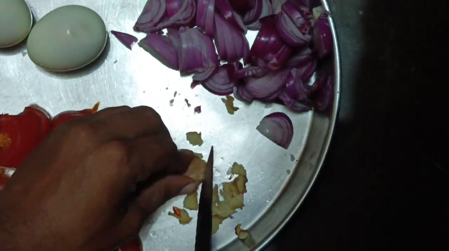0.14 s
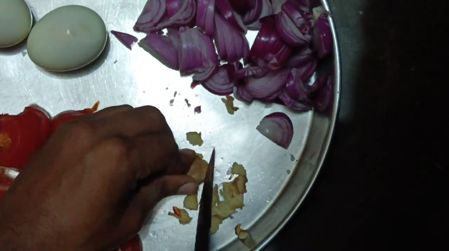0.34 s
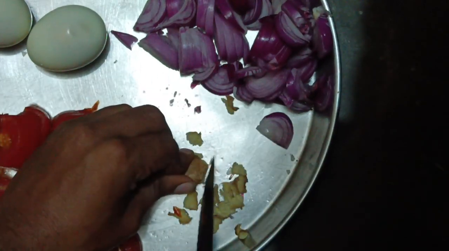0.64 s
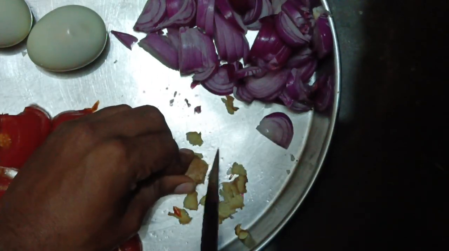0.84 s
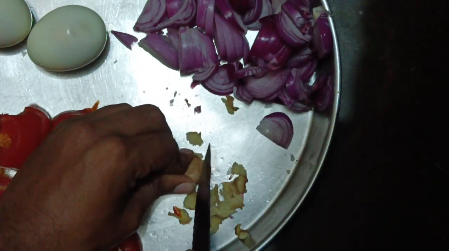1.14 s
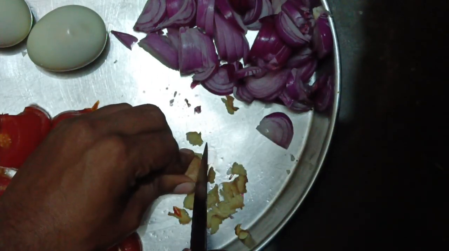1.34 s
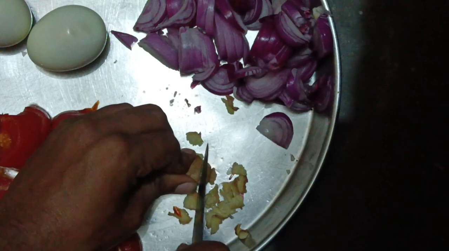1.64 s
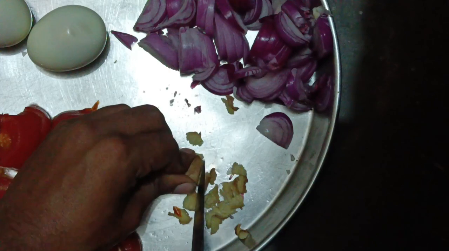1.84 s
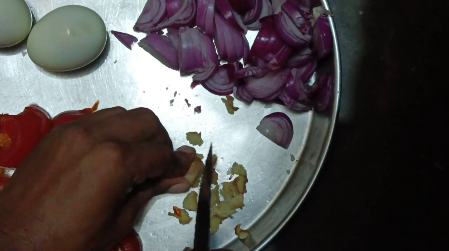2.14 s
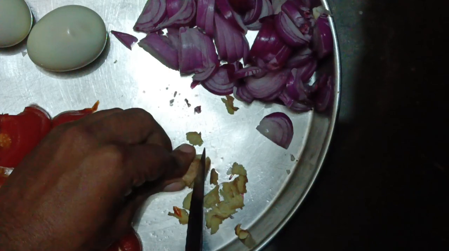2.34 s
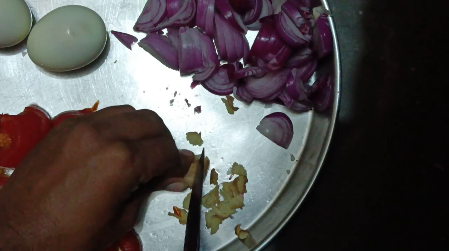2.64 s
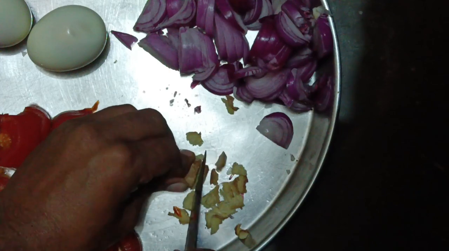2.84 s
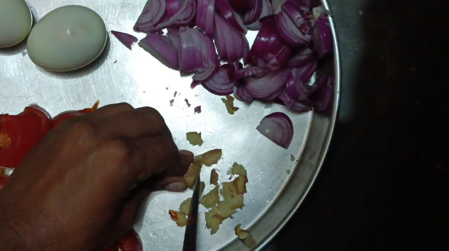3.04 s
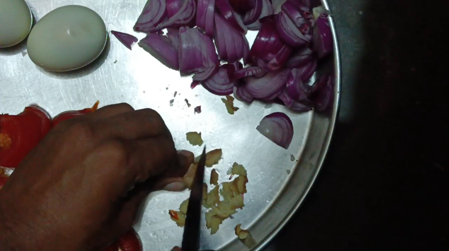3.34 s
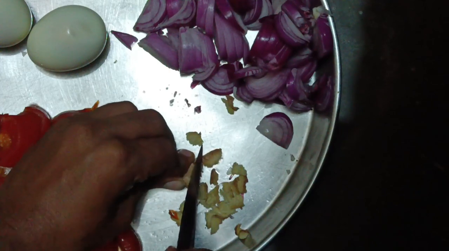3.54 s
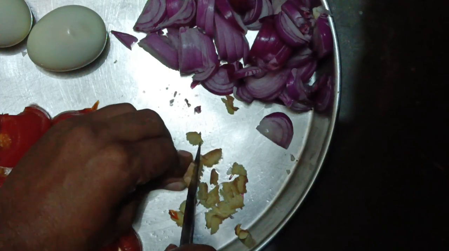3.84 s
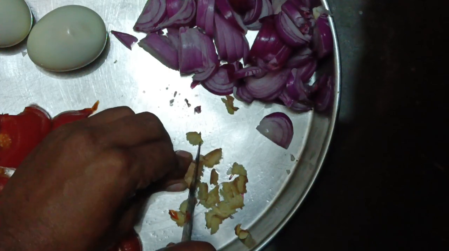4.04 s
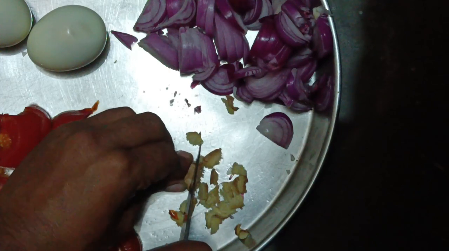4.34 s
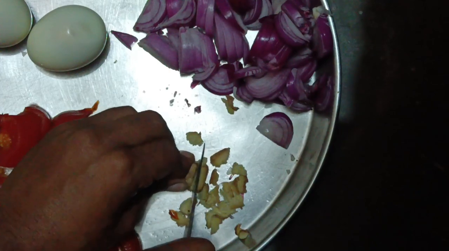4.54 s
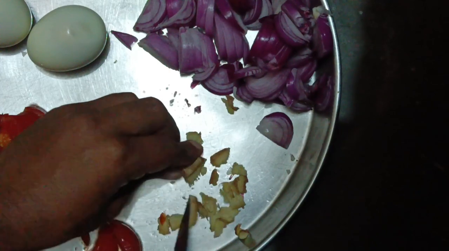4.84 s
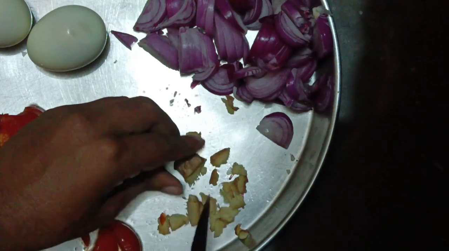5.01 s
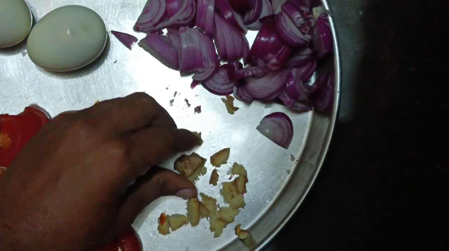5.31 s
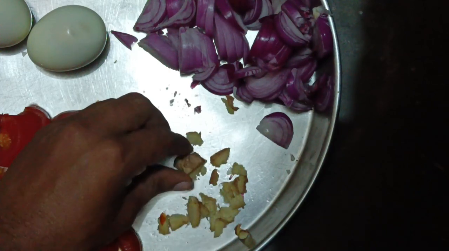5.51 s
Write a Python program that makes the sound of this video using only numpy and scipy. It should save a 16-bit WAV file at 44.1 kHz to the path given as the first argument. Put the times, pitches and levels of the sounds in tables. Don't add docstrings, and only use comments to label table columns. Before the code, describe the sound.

A knife cuts ginger on a steel plate, very close and stronger on the right. A faint squeal leads to hard metallic knocks at uneven intervals, with little crunches, ticks and drags between. Bare kitchen walls answer each blow briefly. Dull regular thuds come from next door, over a very quiet lorry drone and patchy street noise picked up by a phone.

```python
import sys
import numpy as np
from scipy import signal
from scipy.fft import rfft, irfft
from scipy.io import wavfile
from scipy.ndimage import uniform_filter1d

SR = 44100
rng = np.random.default_rng(int(sys.argv[2]) if len(sys.argv) > 2 else 0)


def volts(x):
    e = np.asarray(x, float) / 20
    return 10 ** e


def store_wav(level_fs):
    pcm = np.round(np.clip(np.atleast_2d(level_fs), -1, 1) * 32767)
    wavfile.write(sys.argv[1], SR, pcm.T.astype(np.int16))


N = 250047


def unit(x):
    return x / np.sqrt(np.mean(x ** 2))


def colour(x, points):
    hz, db = np.transpose(points)
    f = np.fft.rfftfreq(x.shape[-1], 1 / SR) + 1
    return irfft(rfft(x) * volts(np.interp(np.log(f), np.log(hz), db)), x.shape[-1])


def band(x, lo_hz, hi_hz):
    return signal.sosfilt(signal.butter(2, [lo_hz, hi_hz], "band", fs=SR, output="sos"), x)


def stereo(size, alike_hz=500):
    mid, side = rng.standard_normal((2, size))
    side = signal.sosfilt(signal.butter(1, alike_hz, "high", fs=SR, output="sos"), side)
    return np.array([mid + side, mid - side])


def walk(rate, size=N):
    hold = int(SR / rate)
    steps = np.repeat(rng.standard_normal(size // hold + 1), hold)
    return 1.4 * uniform_filter1d(uniform_filter1d(steps, hold), hold)[:size]


def steep(noise, hz, width, drift=0.019):
    turn = np.exp(2j * np.pi * np.cumsum(hz * (1 + drift * walk(9, size=noise.shape[-1]))) / SR)
    lowpass = signal.butter(2, width / 2.5, fs=SR, output="sos")
    return unit(np.real(turn * signal.sosfilt(lowpass, noise * turn.conj())))


def swells(rows, rise_db_s, fall_db_s):
    t = np.arange(0, N / SR + .01, .002)
    gain = 0
    for a, b, db in rows:
        gain = gain + volts(db - rise_db_s * np.maximum(a - t, 0) - fall_db_s * np.maximum(t - b, 0))
    return np.interp(np.arange(N) / SR, t, gain)


def ring(modes, seconds, scatter_db=0., detune=0.):
    hz, db, t60 = np.transpose(modes)[:, :, None]
    t = np.arange(int(seconds * SR)) / SR
    luck = rng.standard_normal((2, len(modes), 1))
    sense = (-1.) ** np.arange(len(modes))[:, None]
    fade = volts(db + scatter_db * luck[0] - 60 * t / t60)
    x = (sense * fade * np.sin(2 * np.pi * hz * (1 + detune * luck[1]) * t)).sum(axis=0)
    return x / np.abs(x).max()


def add(out, x, s):
    i = int(s * SR)
    out[..., i:i + x.shape[-1]] += x[..., :N - i]


def ports(x, pan_db):
    lag_s = 0.00053
    late = np.pad(x, (int(lag_s * SR), 0))[:len(x)]
    late = signal.lfilter(*signal.butter(3, 8300, fs=SR), late)
    return np.array([late * volts(pan_db / 2), x * volts(-pan_db / 2)])


def lorry():
    # (from/s, to/s, level/dB)
    revs = [(-.1, .2, -81.5), (.31, .36, -55), (.47, .51, -55), (.61, .8, -52), (.86, .94, -51),
            (.97, 1.22, -51.5), (1.37, 1.6, -58), (1.78, 1.95, -56.5), (2.2, 2.25, -74.5),
            (2.52, 2.66, -70), (2.9, 3.02, -59.5), (3.25, 3.45, -66), (4.0, 4.25, -62.5), (4.54, 4.92, -62),
            (5.44, 5.7, -61.5)]
    drone_hz = 64
    turn = 2 * np.pi * np.cumsum(drone_hz * (1 + .025 * walk(3))) / SR
    rumble = unit(band(band(stereo(N, 150), 30, 110), 30, 110))
    drone = unit(volts(2.0 * walk(12)) * np.sin(turn) + .55 * rumble)
    return swells(revs, rise_db_s=259, fall_db_s=125.5) * drone


def traffic():
    # (from/s, to/s, level/dB, bass share/dB, treble share/dB)
    openings = [(-.05, 0.2, -72.5, -13.5, 7.5), (0.933, 1.335, -75, -11, -3),
                (0.463, 0.463, -38, -16.5, -16.5), (0.566, 0.798, -53, -27.5, -20),
                (0.745, 0.912, -63, 5, -3), (1.472, 1.54, -73.5, 5.5, 0), (1.662, 1.839, -56, -8.5, 9),
                (2.511, 2.682, -71.5, 8, -7), (2.808, 2.939, -44, -9.5, -40.5),
                (2.97, 3.066, -51, -11.5, 3.5), (3.12, 3.283, -45.5, -19.5, -17),
                (3.326, 3.486, -58.5, 2, 9.5), (3.67, 3.715, -55, -5.5, -7), (4.0, 4.15, -68.5, 11, -3),
                (4.164, 4.285, -58, 3.5, -6), (4.483, 4.838, -50.5, -21, 7.5), (4.81, 5.034, -65, 5, -3.5),
                (5.062, 5.19, -66.5, -7, 5.5), (5.547, 5.706, -67, -1.5, 2)]
    # (f/Hz, level per Hz/dB)
    wash_colour = [(410, -35), (700, -2), (1110, 0), (1260, 0), (1930, -7), (2160, -4.5), (2780, -8),
                   (3030, -7.5), (3310, -11), (6200, -21), (7670, -14.5), (10500, -35), (14000, -57)]
    start, end, db, bass_db, treble_db = np.transpose(openings)
    bass, middle, treble = (swells(zip(start, end, db + share), rise_db_s=206.5, fall_db_s=165)
                            for share in (bass_db, 0, treble_db + 0.5))
    low = unit(volts(3.0 * walk(10)) * band(band(stereo(N, 700), 130, 600), 130, 600))
    noise, wash = colour(stereo(N), wash_colour), 0
    for hz in 700 * 2 ** (np.arange(26) / 6):
        opening = middle if hz < 3000 else treble
        wash = wash + volts(2.5 * walk(6)) * opening * band(noise, hz, hz * 1.09)
    return bass * low + volts(-1.5) * wash / np.std(noise)


def pounding():
    # (t/s, peak/dB, brightness/dB, share above 200 Hz/dB)
    thuds = [
        (1.769, -28.5, -8.5, 0),
        (2.496, -42.5, 21, 9),
        (3.22, -27, -12, 1),
        (3.957, -25, 17, -0.5),
        (4.689, -27, 15, 1),
        (5.402, -29, -8.5, -0.5),
    ]
    # (f/Hz, level/dB, t60/s)
    house = [(90.4, -11, 1.3), (129.9, -9.5, 2.1), (145.1, 0, 1.26), (163.9, 1, 1.1), (145.3, -4, 1.3),
             (165, -6, 1.1), (180.9, -9.5, 1.9), (202, -8, 1.3), (212.9, 8, 0.3), (226, -11.5, 1.7),
             (263.6, 2, 0.38), (243.3, -7, .9), (286, -5.5, 0.87), (315, -28.5, 0.27), (346.6, -8, 0.88),
             (442, -9, 0.4), (509.6, -6.5, 0.21), (610, -27, 0.11), (696, -16, 0.49), (844, -13.5, 0.29),
             (970, -23.5, 0.15)]
    out, t = np.zeros((2, N)), np.arange(int(1.0 * SR)) / SR
    swell = (1 - np.exp(-t / 0.012)) / (1 + (t / .5) ** 8)
    spread = [0.03496, 0, .2] * rng.standard_normal((3 * len(house), 3))
    others = np.repeat(house, 3, axis=0) * (1 + spread)
    others = others - [0, 1, 0] * np.where(others[:, :1] < 190, 13, 5)
    cluster = np.vstack([house, others])
    waves = np.array([ring(cluster, 1.0, 2., .002), ring(cluster, 1.0, 2., .002)]) * swell
    dull = volts(-11.0 - 60 * t / 0.61) * unit(band(band(stereo(len(t), 900), 210, 540), 210, 540)) * swell
    slap = volts(-34.0 - 60 * t / .5) * unit(band(band(stereo(len(t)), 550, 2100), 670, 970))
    edge = volts(-27.0 - 60 * t / 0.093) * unit(band(band(stereo(len(t)), 1140, 1260), 1140, 1260))
    slap = (slap + edge) * swell
    for s, db, bright_db, upper_db in thuds:
        body = colour(waves, [(180, 0.0035), (220, upper_db)])
        add(out, volts(db) * (body + volts(upper_db) * dull + volts(bright_db) * slap), s)
    return out


def flickering(rows):
    out, flicker = np.zeros((2, N)), volts(2 * walk(14))
    for start, end, hz, width, db in rows:
        size = int((end - start) * SR)
        if start:
            fade = signal.windows.tukey(size, .6)
        else:
            fade = np.minimum(3 * np.linspace(1, 0, size), 1)
        shimmer = flicker[rng.integers(N - size):][:size]
        add(out, volts(db) * steep(stereo(size), hz, width, .002) * fade * shimmer, start)
    return out


def hums():
    # (from/s, to/s, f/Hz, level/dB)
    hum_rows = [(.11, .22, 1230, -61.5), (3.75, 3.83, 1270, -69.5), (5.4, 5.52, 910, -64.5),
                (.2, .34, 155, -69), (.58, 0.726, 150, -65), (.74, 0.957, 147, -50.5),
                (0.74, 1.26, 142, -60.5), (.74, 1.01, 190, -55.5), (.95, 1.22, 187, -65.5),
                (1.3, 2, 136, -66.5), (1.423, 1.555, 263, -68.5), (3.72, 3.9, 315, -77),
                (2.83, 3.18, 252, -57), (2.15, 2.4, 330, -77.5), (3.64, 3.72, 462, -62.5)]
    return flickering([(a, b, hz, 0.084 * hz, db) for a, b, hz, db in hum_rows])


def squeal():
    # (f/Hz, width/Hz, level/dB, duration/s)
    tones = [(1249, 51, -65.5, 0.37), (1530, 140, -73.5, 0.17), (2040, 80, -83, 0.33),
             (2796, 61, -76.5, .3), (3237, 50, -75, .25), (3600, 63, -77.5, 0.27), (4030, 65, -82.5, .3),
             (4450, 60, -82, 0.17), (4800, 65, -86, 0.2), (5350, 100, -85.5, 0.3), (7700, 570, -80, 0.11)]
    return flickering([(0, s, hz, width, db) for hz, width, db, s in tones])


def streaks():
    # (from/s, to/s, f/Hz, level/dB)
    thin_tones = [(.76, .93, 5320, -85), (.82, .91, 4900, -85), (1.12, 1.27, 4930, -89),
                  (1.32, 1.49, 4900, -77), (.92, 1.2, 3700, -88), (.93, 1.32, 2400, -81),
                  (.88, 1.34, 2000, -76), (.95, 1.06, 2780, -82), (1.32, 1.47, 2380, -76),
                  (1.3, 1.48, 3580, -74), (4.9, 5.05, 1290, -70), (5.08, 5.34, 1250, -74),
                  (4.95, 5.29, 1000, -74), (3.96, 4.2, 1300, -70), (3.96, 4.2, 1690, -72),
                  (3.96, 4.3, 2400, -72), (3.98, 4.2, 3500, -78), (5.42, 5.7, 1420, -76)]
    width_hz = 81
    return flickering([(a, b, hz, width_hz, db) for a, b, hz, db in thin_tones])


def noise_patches():
    # (f/Hz, width/Hz, level/dB)
    patch_bands = [(610, 180, 1), (975, 130, -1.5), (1250, 210, -3), (1481, 300, -4), (1800, 220, -2),
                   (2050, 240, -2), (2380, 150, -3), (3000, 530, -7), (3600, 500, -5.5), (4120, 720, -6),
                   (4968, 540, 1), (7540, 1400, 2.5), (10400, 680, -5.5)]
    # (from/s, to/s, level/dB, strongest near/Hz, fall away from there/dB per octave)
    patch_rows = [(0.535, 0.748, -53.5, 1138, 36), (0.689, 0.928, -60.5, 975, 28),
                  (0.791, 1.025, -65, 594, 43.5), (0.849, 1.484, -63.5, 1500, 59),
                  (1.306, 1.467, -69, 3600, 53), (5.028, 5.202, -60, 3730, 33.5),
                  (1.273, 1.553, -73.5, 610, 38), (1.313, 1.499, -63.5, 2860, 16),
                  (2.477, 2.703, -62.5, 1100, 25.5), (2.583, 2.772, -73.5, 6200, 8),
                  (2.98, 3.135, -70, 9500, 13), (3.13, 3.273, -74, 10400, 40), (3.27, 3.495, -75, 8550, 10),
                  (4.077, 4.319, -63.5, 4620, 29), (5.07, 5.28, -68, 2900, 36.5),
                  (5.39, 5.52, -66.5, 1680, 37), (5.524, 5.75, -69.5, 2156, 18),
                  (5.495, 5.752, -74, 5350, 19.5), (3.904, 4.094, -76, 2250, 16.5)]
    out, patch_noise = np.zeros((2, N)), stereo(N)
    for hz, width, db in patch_bands:
        rows = []
        for a, b, patch_db, near_hz, fall_db in patch_rows:
            rows.append((a + .04, b - .04, db + patch_db - fall_db * abs(np.log2(hz / near_hz))))
        out += swells(rows, 340, 300) * steep(patch_noise, hz, width) * volts(2.8 * walk(16))
    return out


def rim():
    # (f/Hz, width/Hz, level/dB, t60/s)
    rim_tones = [(1515, 160, -42.5, 0.49), (1864, 124, -39.5, 0.33), (2080, 150, -34, 0.4),
                 (2257, 250, -43.5, 0.42), (3556, 250, -36.5, 0.5), (3880, 370, -37.5, 0.54),
                 (5610, 970, -35, 0.41)]
    out, t = np.zeros((2, N)), np.arange(int(.4 * SR)) / SR
    tones = sum(volts(db - 60 * t / t60) * steep(stereo(len(t)), hz, width)
                for hz, width, db, t60 in rim_tones)
    add(out, tones * np.minimum(t / 0.0032, 1), 4.691)
    return out


def walls():
    # (f/Hz, level per Hz/dB)
    wall_colour = [(110, -48.5), (180, -19.5), (293, -12.5), (370, -8.5), (450, -7), (600, -11), (830, -12),
                   (1000, -14), (1450, -4), (1550, -12), (1650, -3), (1880, -12.5), (2360, -2.5),
                   (2560, -5), (2820, -1.5), (3060, -7.5), (3250, -7.5), (3420, -7.5), (3680, -7.5),
                   (4250, -7.5), (4800, -7.5), (5590, -8), (6300, -16.5), (6800, -15), (7550, -6.5),
                   (9640, -27), (13500, -38.5), (15300, -40), (16000, -52)]
    # (f/Hz, width/Hz, level/dB, t60/s)
    linger = [(1480, 90, -22.5, 0.41), (1651, 80, -18.5, 0.35), (2000, 46, -24.5, .4),
              (2375, 130, -19.5, 0.5), (2808, 42, -17.5, .5), (3180, 60, -27, .4), (3655, 110, -22.5, 0.55),
              (4250, 99, -26, .45), (4420, 200, -27, .6), (7550, 370, -23.5, 0.45)]
    hold_s, t60_s, uneven_db = 0.044, 0.28, 2
    t = np.arange(int(.6 * SR)) / SR
    grains = volts(3.6 * np.minimum(rng.exponential(size=(2, len(t))), 4))
    past_hold = (np.sqrt((t - hold_s) ** 2 + 0.068 ** 2) + t - hold_s) / 2
    fade = volts(-60 * past_hold / t60_s)
    peaks = np.c_[500 * 1.04 ** np.arange(80), uneven_db * rng.standard_normal(80)]
    diffuse = unit(colour(colour(stereo(len(t)) * grains, wall_colour), peaks))
    tones = sum(volts(db - 60 * t / t60) * steep(stereo(len(t)), hz, width, 0.0024)
                for hz, width, db, t60 in linger)
    return (diffuse * fade + tones) * (1 - np.exp(-t / .009))


def room(blows):
    echo = walls()
    air = volts(4 - 60 * np.arange(echo.shape[1]) / SR / 3.7)
    top = volts([[-8], [2]]) * air * band(echo, 7500, 16000)
    parts = band(echo, 210, 1100), band(echo, 1100, 4800), band(echo, 5700, 9370), top
    far = sum(signal.fftconvolve(b[None], part)[:, :N] for b, part in zip(blows, parts))
    return volts(-29.5 + 15.5) * far


def steel(force, low_db, top_db):
    # (f/Hz, level/dB)
    crack_colour = [(300, -48), (1000, -13), (1550, -6), (1880, -11), (2200, -2.5), (2800, -7), (3500, -8),
                    (4600, -17), (5600, -6), (6500, -14), (7600, -4), (8600, -12.5), (9600, -18.5),
                    (12000, -22), (15500, -38)]
    # (f/Hz, level/dB, t60/s)
    low_modes = [(360, 25, 0.037), (440, 25, 0.03), (510, 26, 0.025), (620, 29, 0.03), (827, 19, .03),
                 (1023, 10, .04)]
    tilt = [(3800, 0), (6000, top_db + 14)]
    low = signal.fftconvolve(force, ring(low_modes, .08, 3., .03))[:len(force)]
    crack = colour(colour(force, crack_colour), tilt)
    return crack / np.abs(crack).max() + volts(low_db - 3.0) * low / np.abs(low).max()


def crunch(rows, length):
    near, blows = np.zeros((2, N)), np.zeros((4, N))
    t = np.arange(int(.06 * SR)) / SR
    for s, db, top_db, room_db in rows:
        spikes = volts(1.6 * np.minimum(rng.exponential(size=len(t)), 3))
        envelope = np.exp(-t / length) * np.minimum(t / (0.19 * length), 1)
        snaps = rng.standard_normal(len(t)) * spikes * envelope
        add(near, volts(db) * ports(steel(snaps, -20.0, top_db), -17.5), s)
        shares_db = np.array([[-3], [0], [.5 * top_db + 12.0], [.5 * top_db + 4.0]])
        add(blows, volts(db + room_db + shares_db), s)
    return near, blows


def ticks():
    # (t/s, peak/dB, 7.6 kHz share/dB, room/dB)
    touches = [(0.162, -63.5, 21, -12.5), (0.188, -52, 4.5, -6), (0.3731, -42, -24, -7.5),
               (1.1178, -62.5, -16, 4), (1.514, -50.5, -14, 0.5), (3.672, -37.5, -20, -10),
               (3.8593, -61, -9.5, 8.5), (4.1984, -48, -14.5, 10), (4.258, -53, -7.5, -12.5),
               (4.353, -47.5, -4.5, -4), (4.4127, -42, -8, -10), (5.662, -67, -15, 0.5)]
    return crunch(touches, 0.0061)


def tears():
    # (t/s, peak/dB, 7.6 kHz share/dB, room/dB)
    fibres = [(0.259, -57, -0.5, 3.5), (0.34, -58, 2.5, 2), (0.362, -49.5, -12.5, -17.5),
              (0.6516, -42.5, -19.5, -10), (1.3992, -62.5, -1, -9), (1.457, -43.5, -22.5, 10),
              (1.59, -53, -3, -1), (1.613, -39.5, -16.5, -2), (1.892, -52, -11.5, 10.5),
              (2.729, -64, -20, 21), (2.748, -55.5, -15, 7), (2.763, -38.5, -27, 8),
              (2.773, -38.5, -20, 10.5), (3.62, -52, -21.5, -1), (3.6391, -43, -22.5, 19.5),
              (3.9452, -41.5, -17.5, 10.5), (3.966, -39.5, -16, -7), (4.448, -40, -21, -10),
              (4.404, -48.5, -6, 1), (4.4268, -35.5, -8, -10)]
    return crunch(fibres, 0.018)


def blow(db, low_db, top_db):
    # (f/Hz, level/dB, t60/s)
    plate = [(1394, -3, 0.022), (1680, 1, 0.036), (2150, -2.5, 0.018), (2600, 2, 0.0063),
             (2746, 6.5, 0.011), (3964, -4, 0.041), (5660, 3.5, 0.015), (7200, -14.5, 0.0053),
             (7474, 0.5, 0.024)]
    contact_s, chatter_s = .0016, .0002
    t = np.arange(int(.1 * SR)) / SR
    soft = np.exp(-.045 * (db + 8))
    rocking = 1 + .7 * np.cos(2 * np.pi * (t - contact_s) / .0035)
    force = volts(-18.5 - 60 * t / .05) * soft * rocking * rng.standard_normal(len(t)) * (t > .002)
    jitter, strength = rng.standard_normal((2, 60))
    for k, share in enumerate(np.hanning(int(8 * soft) + 2)[1:-1][:60]):
        s = contact_s + (k + .1 * np.log(soft) * jitter[k]) * chatter_s
        force[round(s * SR)] = share * (-1) ** k * volts(2 * strength[k])
    x = steel(force, low_db, top_db)
    add(x, volts(-8.0) / soft * band(ring(plate, .08, 0.68, 0.039), 660, 21000), contact_s)
    return x


def knocks():
    # (t/s, peak/dB, 300-1000 Hz share/dB, 7.6 kHz share/dB, room/dB)
    knock_rows = [
        (0.3919, -9.5, -34.5, -16, 1.5),
        (0.6651, -48, -28, -16, 11.5),
        (1.6454, -8, -36.5, -17, 1.5),
        (1.908, -46.5, -34, -15, 4.5),
        (2.807, -8.5, -40, -16, 3.5),
        (3.657, -23, -33, -25.5, -12),
        (3.6798, -33, -21, -22, -53.5),
        (3.9494, -36, -21, -18, -0.5),
        (4.4546, -7.5, -36.5, -14, -1),
        (4.689, -21.5, -45, -18.5, 10),
    ]
    near, blows = np.zeros((2, N)), np.zeros((4, N))
    for s, db, low_db, top_db, room_db in knock_rows:
        pan_db = -8.5 + 0.4082 * db
        add(near, volts(db) * ports(blow(db, low_db, top_db), pan_db), s)
        shares_db = np.array([[.5 * low_db + 17.5], [0], [.5 * top_db + 10.0], [1.48 * top_db + 21.0]])
        add(blows, volts(db + room_db + shares_db), s)
    return near, blows


def knife():
    near, blows = zip(ticks(), tears(), knocks())
    return sum(near) + room(sum(blows))


def scene():
    background = lorry() + traffic() + pounding() + hums()
    tones_and_bands = squeal() + streaks() + noise_patches()
    return background + tones_and_bands + rim() + knife()


def suppress(x):
    # (f/Hz, level per bin/dB)
    noise_estimate = [(40, -86), (150, -89.5), (600, -88.5), (1500, -90), (4000, -101), (8000, -100),
                      (12000, -108), (16000, -112)]
    hz, _, z = signal.stft(x, SR, nperseg=1024, noverlap=768)
    power = uniform_filter1d(np.mean(np.abs(z) ** 2, axis=0), size=3, axis=0)
    power = signal.lfilter([.3], [1, -.7], power)
    uneven_db = 6 * uniform_filter1d(rng.standard_normal(len(hz)), size=4)
    f, db = np.transpose(noise_estimate)
    noise = volts(2 * (np.interp(np.log(hz + 1), np.log(f), db) + uneven_db))[:, None]
    gain = np.maximum(1 - noise / (power + 1e-18), volts(-16))
    return signal.istft(z * gain, SR, nperseg=1024, noverlap=768)[1][:, :N]


def top_cut(x):
    return signal.sosfilt(signal.butter(12, 16650, fs=SR, output="sos"), x)


def record(dry):
    # (f/Hz, level per Hz/dB)
    hiss_colour = [(25, -6.5), (60, 2), (400, -6), (1500, -13.5), (5000, -23), (8000, -29), (11000, -31.5),
                   (16000, -41.5)]
    ceiling = 0.88
    top = signal.ellip(8, .2, 70, 15950, fs=SR, output="sos")
    bottom = signal.butter(3, 42, "high", fs=SR, output="sos")
    hiss = volts(-80) * unit(colour(stereo(N), hiss_colour))
    rounded = ceiling * np.tanh(dry / ceiling)
    heard = signal.sosfilt(np.vstack([top, bottom]), rounded)
    return top_cut(suppress(heard) + hiss)


dry = scene()
out = record(dry)
store_wav(out)
```